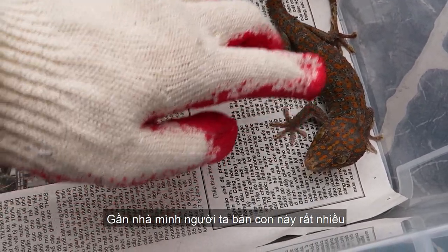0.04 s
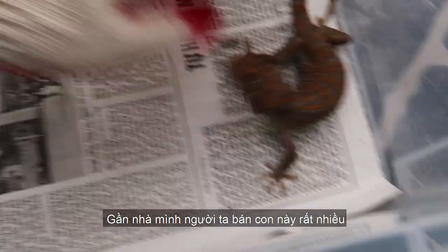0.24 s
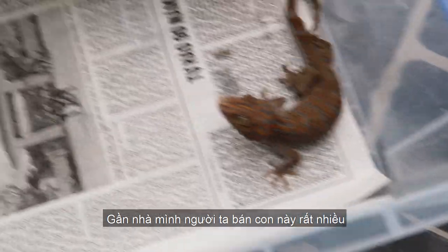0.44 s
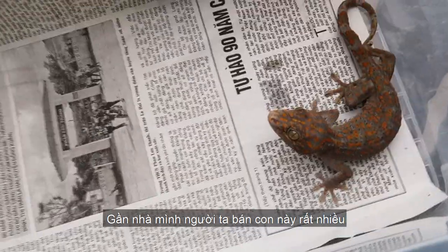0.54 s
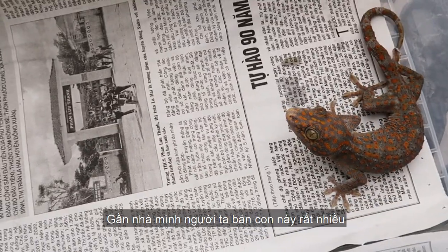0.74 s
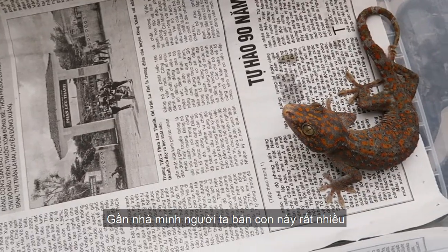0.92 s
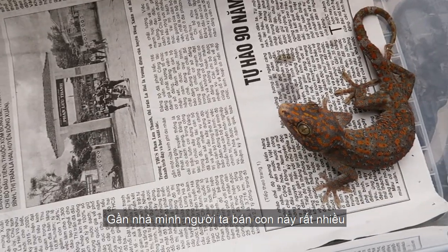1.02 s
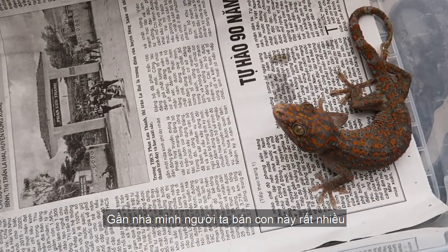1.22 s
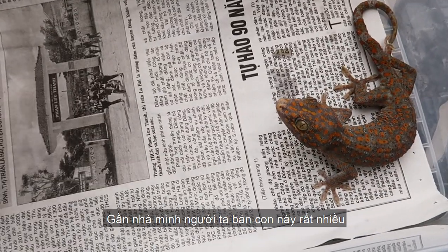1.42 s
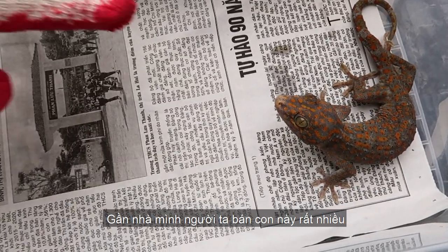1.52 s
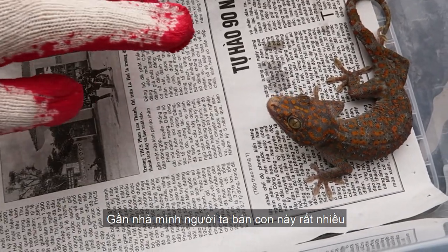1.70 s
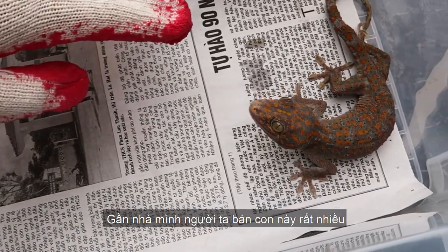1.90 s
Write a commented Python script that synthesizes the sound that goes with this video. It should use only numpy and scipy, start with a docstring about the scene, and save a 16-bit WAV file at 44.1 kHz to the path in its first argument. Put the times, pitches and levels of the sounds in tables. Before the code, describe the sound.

One brief, raspy gecko bark bursts out close up and distorted, with a paper scuff, a soft knock on a plastic tub and small claw ticks. Then only distant traffic remains: rumble, a swelling engine, faintly squealing brakes.

```python
"""Gecko bark in a plastic tub.

A gecko lunges on newspaper and gives one short bark that overloads the close microphone.
Its throat pulses fall in pitch and end as separate creaks; the tub and the room ring briefly.
Claws tick, the paper rustles and the body knocks the tub.
Outside, traffic rumbles, an engine drones and swells, and far brakes squeal thinly."""
import sys
import numpy as np
from scipy import signal
from scipy.fft import rfft, irfft
from scipy.io import wavfile
from scipy.ndimage import uniform_filter1d

SR = 44100
rng = np.random.default_rng(int(sys.argv[2]) if len(sys.argv) > 2 else 0)


def put_to_file(sound):
    """Save the sound as 16-bit audio at rate SR, in the file named by the first command-line argument."""
    columns = np.atleast_2d(sound).T  # one column per channel
    safe = np.clip(columns, -1, 1)
    whole_steps = np.round(safe * 32767)
    wavfile.write(sys.argv[1], SR, whole_steps.astype(np.int16))


N = 85995

# stereo width of reflections, ticks and paper: freq_hz, side_minus_mid_db
DIFFUSE_WIDTH = [(100, -23.5), (1100, -11), (2500, -8.5), (5000, 1), (10000, 8)]


def undb(db):
    """Decibels to gain."""
    return 10 ** (np.asarray(db) / 20)


def unit(x):
    """Scale to rms 1."""
    return x / np.sqrt(np.mean(x ** 2))


def clock():
    """Sample times in seconds."""
    return np.arange(N) / SR


def colour(x, points):
    """Filter by (freq_hz, gain_db) points."""
    hz, db = np.array(points).T
    bin_hz = np.arange(N // 2 + 1) * SR / N
    gain_db = np.interp(np.log(bin_hz + 1), np.log(hz), db)
    return irfft(rfft(x) * undb(gain_db), N)


def walk(rate_hz):
    """Smooth random wander, rms 1."""
    hold = int(SR / rate_hz)
    steps = np.repeat(rng.standard_normal(N // hold + 1), hold)
    return unit(uniform_filter1d(uniform_filter1d(steps, hold), hold)[:N])


def resonate(x, hz, width_hz):
    """One resonance, gain 1 at its centre."""
    hz = min(hz, SR / 2 - 2000)
    return signal.lfilter(*signal.iirpeak(hz, hz / width_hz, fs=SR), x)


def stereo_noise(width):
    """Noise whose left-right difference depends on frequency."""
    mid, side = rng.standard_normal((2, N))
    return unit(mid + colour(side, width) * np.array([[1], [-1]]))


def fade(start_s, t60_s):
    """Sudden onset, exponential decay."""
    age_s = clock() - start_s
    return (age_s >= 0) * np.exp(-np.log(1000) * np.maximum(age_s, 0) / t60_s)


def gate(start_s, end_s, edge_s):
    """Rise, hold and release."""
    inside_s = np.minimum(clock() - start_s, end_s - clock())
    return np.sin(np.pi / 2 * np.clip(inside_s / edge_s + .5, 0, 1)) ** 2


def tone(hz, wander, rate_hz, octave_db):
    """Wavering tone with a weak octave."""
    phase = 2 * np.pi * np.cumsum(hz * (1 + wander * walk(rate_hz))) / SR
    return unit(np.sin(phase) + undb(octave_db) * np.sin(2 * phase))


def reflect(x, t60_s, eq):
    """Dense decaying reflections: a unit-energy tail, then coloured by eq."""
    tail = stereo_noise(DIFFUSE_WIDTH) * fade(0, t60_s)
    tail /= np.sqrt(np.sum(tail ** 2) / 2)
    return colour(signal.fftconvolve(x[None], tail, axes=1)[:, :N], eq)


def road():
    """Traffic rumble: gently swelling noise, near mono in the bass."""
    spectrum = [(20, -25), (33, -13.5), (50, -1.5), (90, 0.5), (150, -4.5), (190, -10.5), (250, -10),
                (400, -22), (700, -25), (900, -29.5), (1500, -33), (3100, -40.5), (6000, -51), (15000, -67)]  # road noise: freq_hz, density_db
    width = [(40, -34), (125, -24), (500, -8), (2000, -5), (8000, 3)]  # stereo width: freq_hz, side_minus_mid_db
    swell = [(0, -0.5), (.3, 3), (.6, -1), (.85, 0.5), (1.05, 0.5), (1.3, 1), (1.7, 0), (1.95, .5)]  # level contour: time_s, gain_db
    level_db = -33 + np.interp(clock(), *np.array(swell).T) + .08 * walk(4.8)
    return undb(level_db) * unit(colour(stereo_noise(width), spectrum))


def engine():
    """A low engine drone that wavers and swells."""
    swell = [(0, -30), (.18, -29.5), (.33, -26), (.55, -40), (1.0, -37.5), (1.2, -33.5), (1.27, -22.5),
             (1.38, -19.5), (1.43, -28.5), (1.65, -31), (1.95, -32)]  # level contour: time_s, level_db
    level_db = np.interp(clock(), *np.array(swell).T) + walk(25)
    return undb(level_db) * tone(hz=120, wander=.012, rate_hz=15, octave_db=-24)


def booms():
    """Low tonal booms and swells in the rumble."""
    swells = [(1.115, 1.208, 59, -15.5), (1.21, 1.324, 70, -27.5), (1.1, 1.7, 37, -44.5),
              (1.2, 1.348, 143, -31.5), (1.68, 1.97, 142, -33.5)]  # low tones: start_s, end_s, pitch_hz, level_db
    return sum(undb(db) * gate(start_s, end_s, edge_s=.036)
               * tone(hz, wander=.012, rate_hz=36, octave_db=-43.5)
               for start_s, end_s, hz, db in swells)


def brakes():
    """Thin squeals hop between pitches and echo along the street."""
    squeals = [(.8, .93, 3125, 3110, -25), (1.335, 1.47, 2905, 2895, -18), (1.44, 1.69, 2790, 2750, -18),
               (1.505, 1.54, 2755, 2750, -10), (1.62, 1.658, 3812, 3822, 0), (1.668, 1.725, 3860, 3860, -5),
               (1.735, 1.8, 3830, 3810, -1), (1.8, 1.96, 3815, 3765, -6), (1.83, 1.96, 1480, 1600, -18)]  # brake tones: start_s, end_s, first_hz, last_hz, gain_db
    street_eq = [(3000, 6), (8000, 1)]  # echo colour: freq_hz, gain_db
    squeal = 0
    for start_s, end_s, first_hz, last_hz, db in squeals:
        pitch_hz = np.interp(clock(), [start_s, end_s], [first_hz, last_hz])
        envelope = undb(db) * gate(start_s, end_s, edge_s=.02)
        squeal += envelope * tone(pitch_hz, wander=.005, rate_hz=150, octave_db=-29.5)
    flutter_db = 3 * walk(130)
    squeal *= undb(-42 + flutter_db)
    return squeal + undb(-2) * reflect(squeal, t60_s=.43, eq=street_eq)


def claws():
    """Claws tick on paper and plastic: short bursts of band noise."""
    strikes = [(0.073, -42.5, 4100), (0.094, -45, 4150), (.338, -39, 8000), (0.343, -31, 3900),
               (0.355, -37, 4000), (.372, -43, 3960), (.389, -47, 6500), (0.651, -35.5, 1000)]  # claw ticks: start_s, level_db, centre_hz
    ticks = 0
    for start_s, db, hz in strikes:
        scratch = stereo_noise(DIFFUSE_WIDTH) * fade(start_s, t60_s=.081)
        scratch *= np.sqrt(SR / hz)  # offsets the bandwidth
        ticks += undb(db) * resonate(resonate(scratch, hz, hz / 2), hz, hz / 2)
    return ticks


def paper():
    """Newspaper slides under the body in fine grains and scuffs as the gecko springs."""
    slides = [(0.173, .05, -52), (0.34, 0.0083, -52), (0.429, 0.057, -43.5)]  # paper slides: centre_s, half_width_s, level_db
    lunge = (.212, .013, -23.5)
    push = sum(undb(db) * np.exp(-((clock() - centre_s) / half_width_s) ** 2)
               for centre_s, half_width_s, db in [*slides, lunge])
    spectrum = [(150, -8.5), (450, 0), (1300, -2), (4500, -8), (6500, -17.5), (14000, -29)]  # rustle: freq_hz, density_db
    rustle = colour(stereo_noise(DIFFUSE_WIDTH), spectrum)
    grain_db = 1.5 * walk(400)
    return push * unit(rustle * undb(grain_db))


def bump():
    """The body knocks the tub: one low damped sine."""
    start_s, pitch_hz = .215, 42
    return undb(-19.5) * fade(start_s, t60_s=.08) * np.sin(2 * np.pi * pitch_hz * (clock() - start_s))


def throat_pulses(cycles, effort, gape):
    """One impulse per cycle; timing and strength grow rougher as the mouth gapes."""
    jitter_s, shimmer_db, rough_growth = 3e-5, 1, 2.1
    t = clock()
    pulses = np.zeros(N)
    for k in range(int(cycles[-1]) + 1):
        i = np.argmax(cycles > k)
        delay, strength = rng.standard_normal(2) * (1 + rough_growth * gape[i])
        near = slice(i - 20, i + 20)
        impulse = np.sinc((t[near] - t[i] - jitter_s * delay) * SR)
        pulses[near] += effort[i] * undb(shimmer_db * strength) * impulse
    return unit(pulses)


def bark():
    """Slowing throat pulses, each with a puff of rasp, ring the throat and mouth."""
    glide = [(.2108, 670), (.216, 578), (.231, 522), (.237, 490), (.247, 420), (.2515, 235), (.258, 175),
             (.2605, 165)]  # throat pulse rate: time_s, rate_hz
    source_eq = [(5000, 2.5), (8000, -7), (15000, -10)]  # pulse and rasp colour: freq_hz, gain_db
    formants = [(486, 130, -6, -6.5), (764, 120, -12, -5), (958, 140, -8.5, -4), (1124, 100, 1.5, -1.5),
                (1438, 200, -5, -5), (1777, 290, -6, -10), (2200, 330, -7, -13), (2483, 99, -10.5, -0.5),
                (2907, 190, -14, -5.5), (3930, 350, -11, -17), (4763, 220, -12, -9.5),
                (6200, 1500, -17, -18), (11000, 3500, -20.5, -18.5)]  # throat and mouth resonances: centre_hz, width_hz, first_db, gaping_db
    level_db, rasp_db, sag_db = 4, -13.5, 5.5
    gape_at_s, gape_ramp_s = .231, .008
    t = clock()
    time_s, rate_hz = np.array(glide).T
    start_s, end_s = time_s[0], time_s[-1]
    sounding = (t >= start_s) * (t <= end_s)
    cycles = np.cumsum(np.interp(t, time_s, rate_hz) * sounding) / SR
    gape = np.clip((t - gape_at_s) / gape_ramp_s + .5, 0, 1)
    effort = sounding * undb(-sag_db * np.clip((t - start_s) / (end_s - start_s), 0, 1))
    pulses = throat_pulses(cycles, effort, gape)
    puffs = np.exp(-(cycles % 1) / .4)
    rasp = rng.standard_normal(N) * effort * (1 + gape) * puffs
    source = colour(pulses + undb(rasp_db) * unit(rasp), source_eq)
    voice = 0
    for k, (hz, width_hz, first_db, gaping_db) in enumerate(formants):
        drive = source * undb(first_db + (gaping_db - first_db) * gape)
        voice += (-1) ** k * resonate(drive, hz, width_hz)
    return unit(voice) * np.sqrt(np.mean(sounding)) * undb(level_db)  # rms over the bark's length


def tub_and_room(voice):
    """The direct voice plus a short ring from the tub and a longer one from the room."""
    tub_eq = [(400, -8.5), (1200, -2.5), (3000, 0.5), (8000, 4.5), (15000, -8.5)]  # tub reflections: freq_hz, gain_db
    room_eq = [(400, 2.5), (1000, 1), (2000, -1.5), (3800, 4.5), (5500, 1), (12000, -10.5)]  # room reflections: freq_hz, gain_db
    tub = undb(-3.5) * reflect(voice, t60_s=.018, eq=tub_eq)
    room = undb(-6.5) * reflect(voice, t60_s=.15, eq=room_eq)
    return voice + tub + room


def scene():
    """The gecko close by, the street far off."""
    gecko = tub_and_room(bark()) + claws() + paper() + bump()
    street = road() + engine() + booms() + brakes()
    return gecko + street


def record(dry):
    """Gain ducks on overload and recovers slowly; peaks clip hard and the top is cut."""
    max_duck_db, attack_s, release_s, cutoff_hz = 9, .032, .4, 15800
    overload = (abs(dry).max(axis=0) > 1).astype(float)
    charge = signal.lfilter([1 / (attack_s * SR)], [1, -np.exp(-1 / (release_s * SR))], overload)
    clipped = np.clip(dry * undb(-max_duck_db * np.tanh(charge)), -1, 1)
    lowpass = signal.ellip(8, .1, 50, cutoff_hz, fs=SR, output="sos")
    return signal.sosfiltfilt(lowpass, clipped)


dry = scene()
out = record(dry)
put_to_file(out)
```